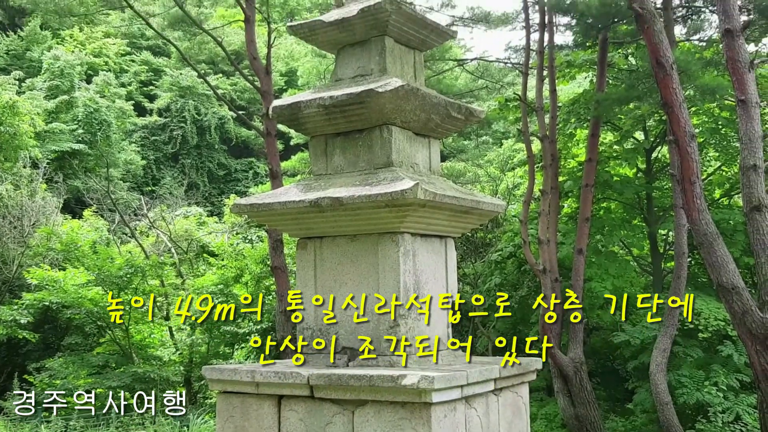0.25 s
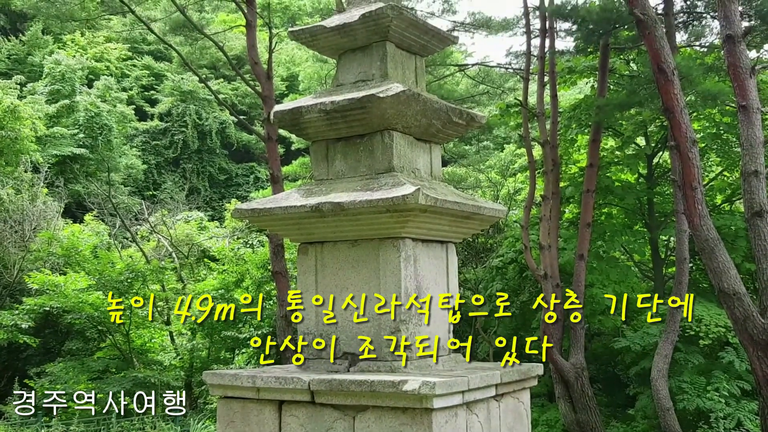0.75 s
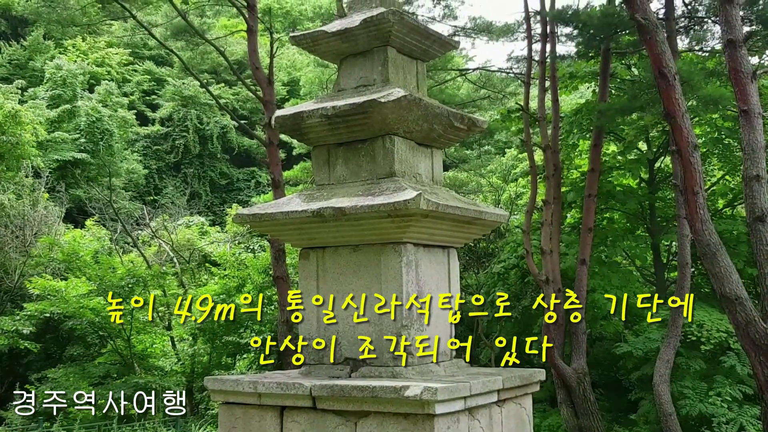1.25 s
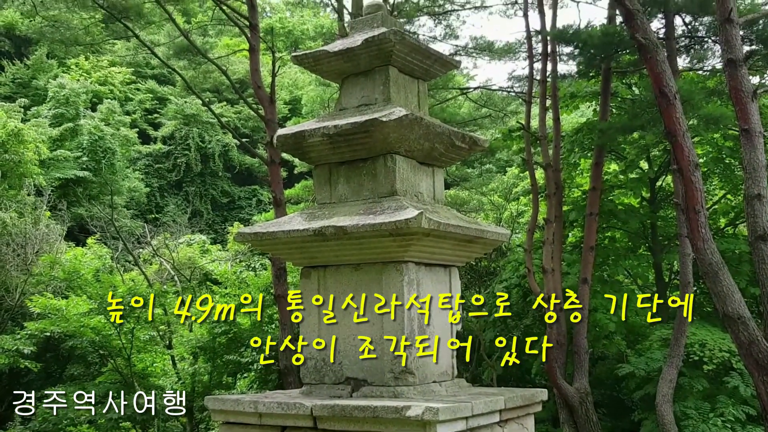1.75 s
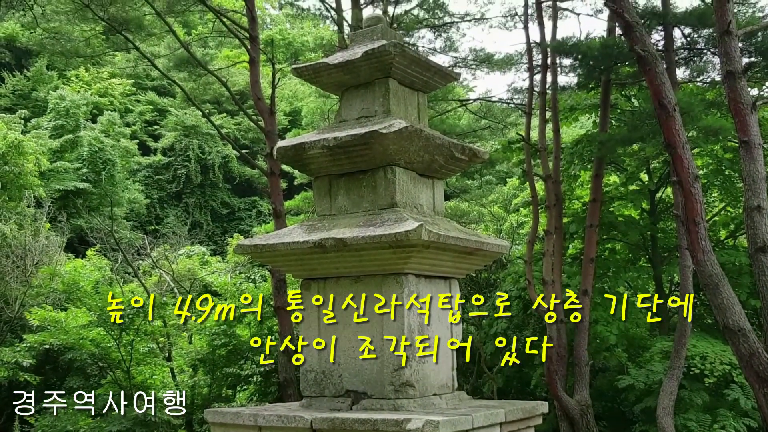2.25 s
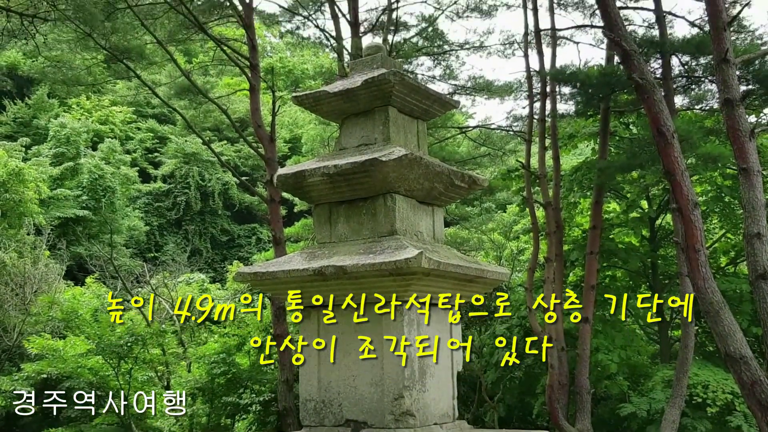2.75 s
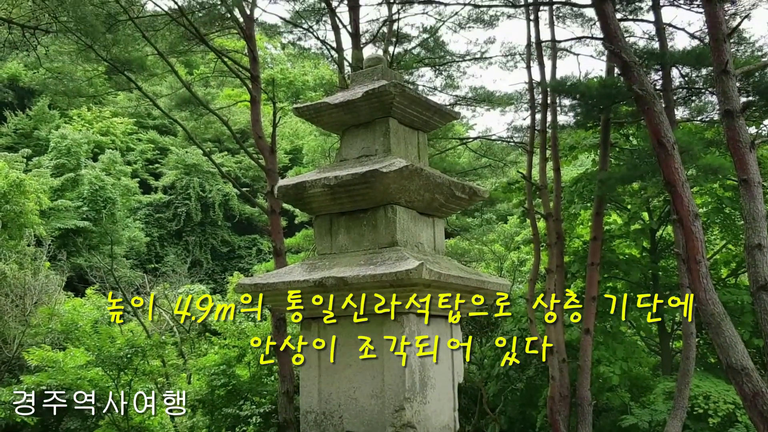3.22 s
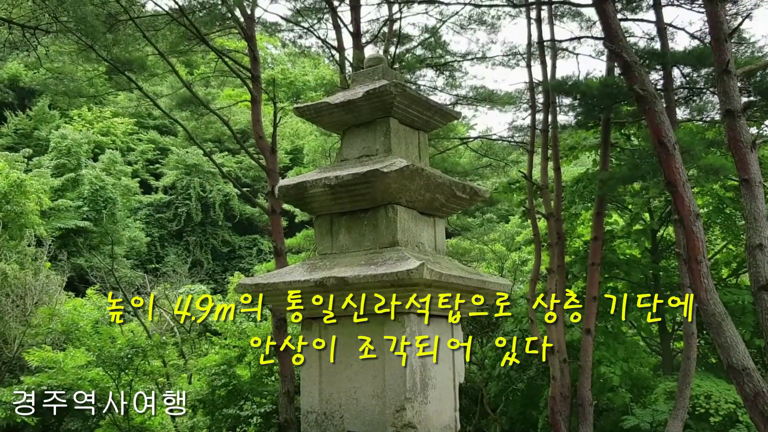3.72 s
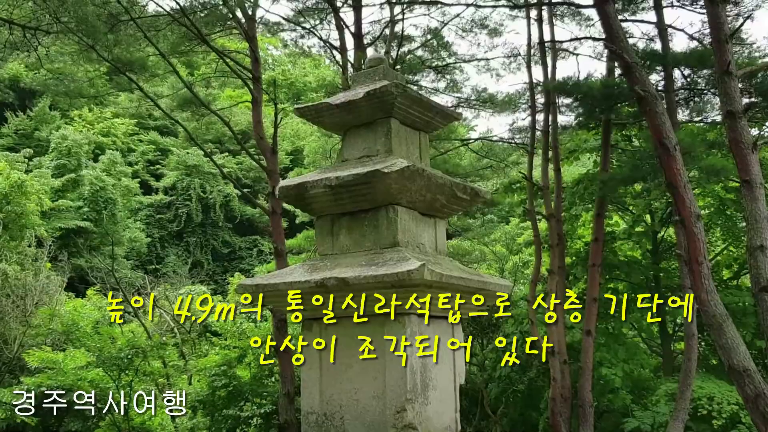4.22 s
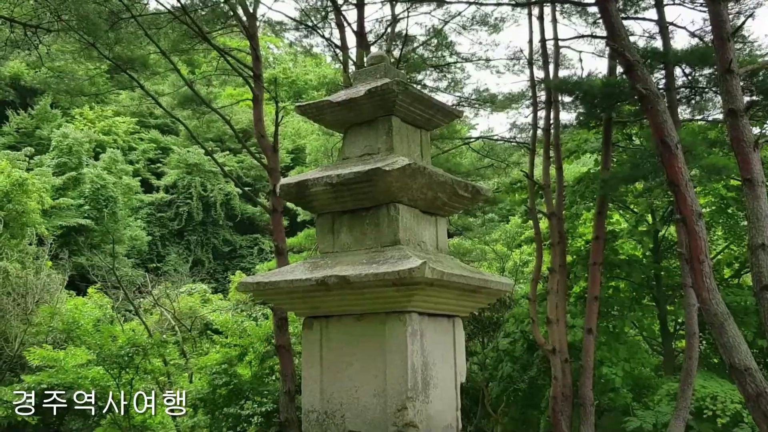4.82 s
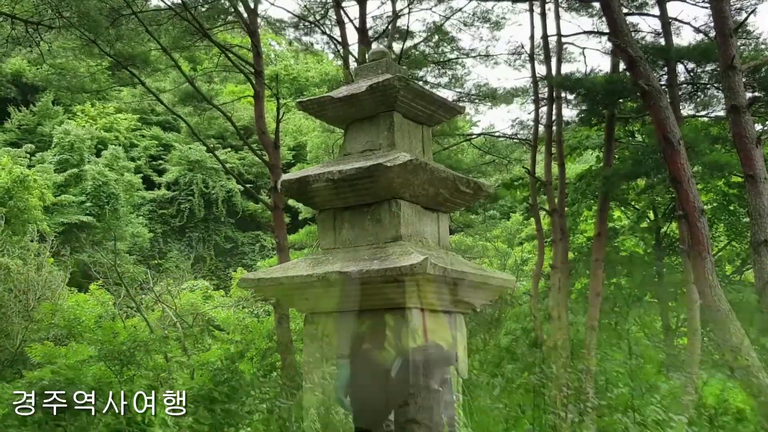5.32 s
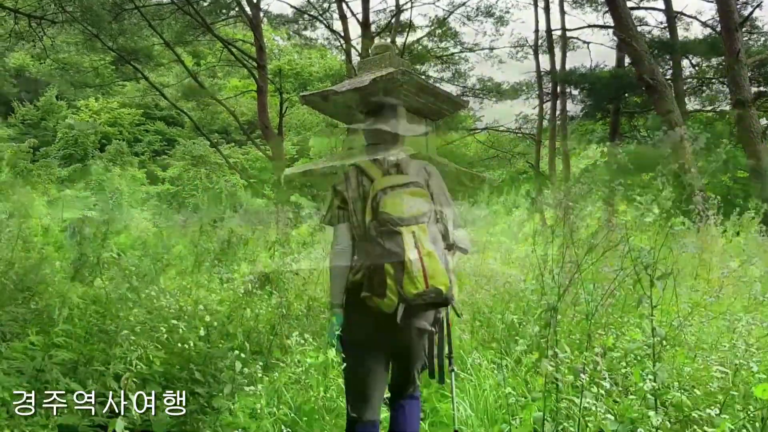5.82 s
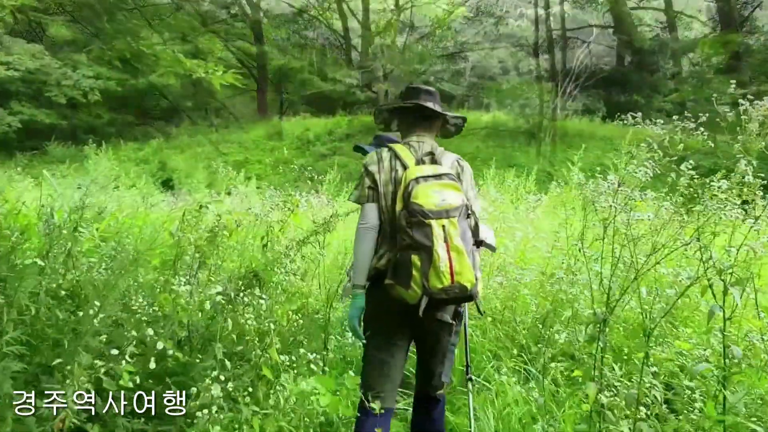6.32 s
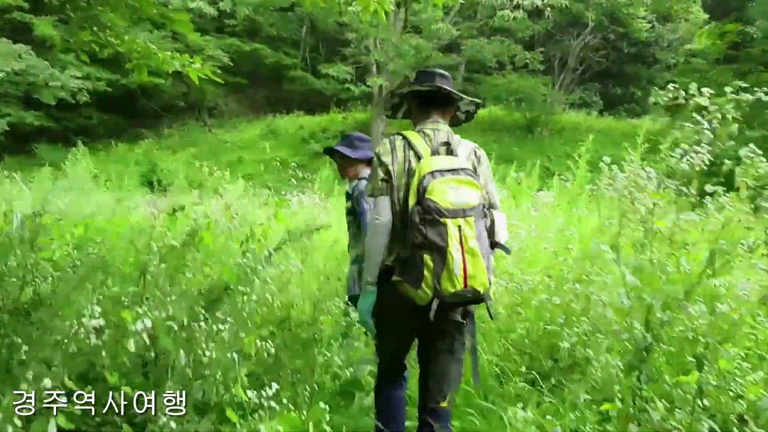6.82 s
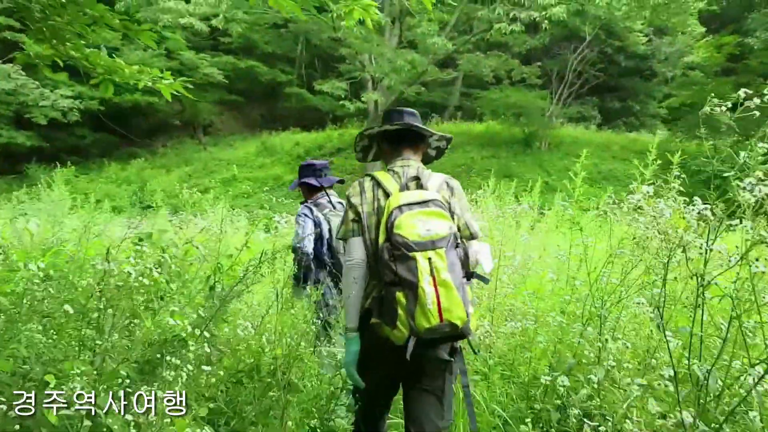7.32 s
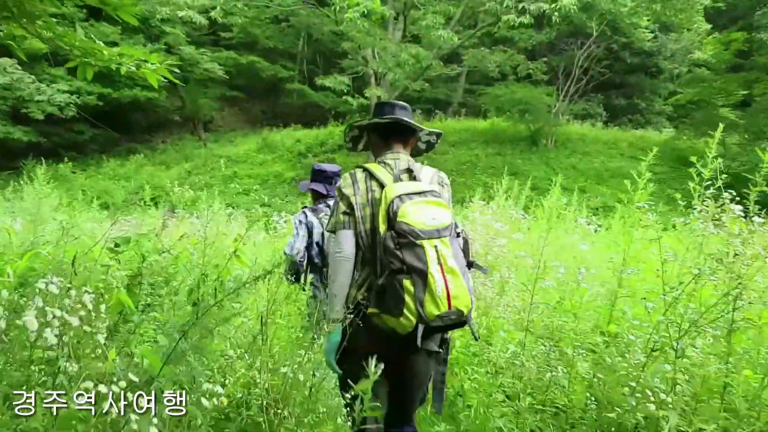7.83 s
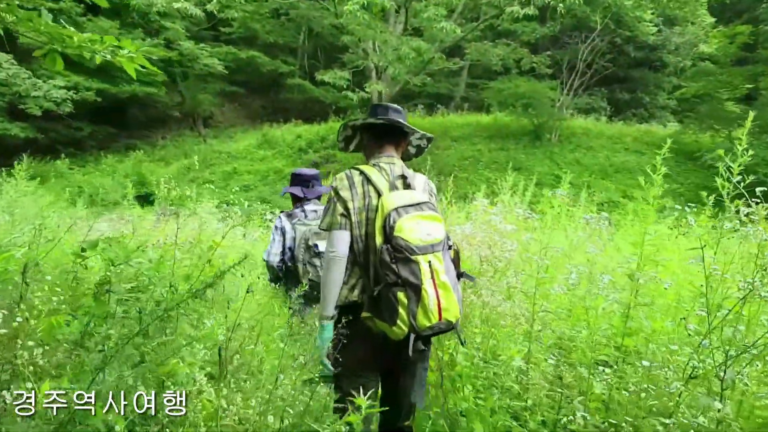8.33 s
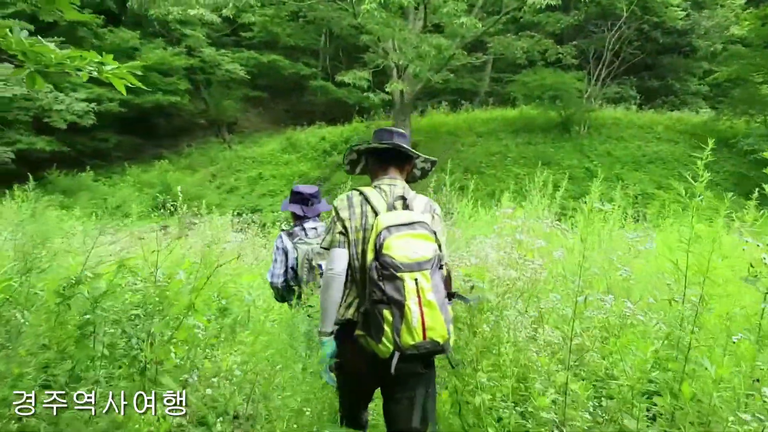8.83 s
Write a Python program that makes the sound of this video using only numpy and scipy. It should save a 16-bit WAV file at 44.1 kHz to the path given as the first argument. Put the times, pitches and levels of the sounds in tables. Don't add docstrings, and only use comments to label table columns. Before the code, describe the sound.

Outdoors in stereo on a hand-held camera microphone: a steady insect chorus around eight kilohertz opens with soft wind thumps and a tap. After a very brief silence, the chorus resumes with pulsing singers lower down and a shrill thirteen-kilohertz voice at left. Another singer builds at right, then stops late. Small rustles, ticks and rubs come from handling, with one clustered knock around four seconds.

```python
import sys
import numpy as np
from scipy import signal
from scipy.fft import rfft, irfft
from scipy.io import wavfile
from scipy.ndimage import uniform_filter1d

SR = 44100
rng = np.random.default_rng(int(sys.argv[2]) if len(sys.argv) > 2 else 0)


def bounce(signal):
    frames = np.transpose(np.atleast_2d(signal))
    limited = np.clip(frames, -1, 1)
    pcm = np.round(limited * 32767).astype(np.int16)
    wavfile.write(sys.argv[1], SR, pcm)


def gain_from_decibels(decibels):
    exponent = np.asarray(decibels, float) / 20
    return 10 ** exponent


N = 399546
TIME = np.arange(N) / SR
HZ = np.fft.rfftfreq(N, 1 / SR) + 1e-3
CHANGE_S = .83


def unit(x):
    return x / np.sqrt(np.mean(x ** 2, axis=-1, keepdims=True))


def by_place(before, after):
    return np.where(TIME < CHANGE_S, before, after)


def columns(table):
    s, *cols = np.transpose(table)
    return [np.interp(TIME, s, c) for c in cols]


def spread(db, pan_db):
    return 2 * gain_from_decibels(db) / np.sqrt(1 + gain_from_decibels(np.array([-2 * pan_db, 2 * pan_db])))


def swells(at_s, sizes, rise_s, fall_s, flat=2):
    t = TIME[::64]
    late = t - np.reshape(at_s, (-1, 1))
    bells = np.exp(-np.abs(late / np.where(late < 0, rise_s, fall_s)) ** flat)
    return np.interp(TIME, t, np.asarray(sizes) @ bells)


def walk(rate):
    k = int(SR / rate)
    steps = np.repeat(rng.standard_normal((2, N // k + 1)), k, axis=1)
    return unit(uniform_filter1d(uniform_filter1d(steps, k), k)[:, :N])


def noise(colour, like):
    mid, side = rng.standard_normal((2, N))
    like = np.clip(like, 0, 1)
    pair = np.sqrt(1 + like) * mid + np.sqrt(1 - like) * side * np.array([[1], [-1]])
    hz, db = np.transpose(colour)
    gain = gain_from_decibels(np.interp(np.log(HZ), np.log(hz), db, -120, -120))
    return unit(irfft(rfft(pair) * gain, N))


def clicks(rate_hz, drift, jitter_s, scatter_db, other):
    fine = 4
    beats = np.cumsum(2 * rate_hz * (1 + drift * walk(4)[0]) / SR) + rng.random()
    count = np.arange(1, int(beats[-1]))
    chance = rng.standard_normal((9000, 2))[:len(count)].T
    at = np.interp(count, beats, TIME) + jitter_s * chance[0]
    size = np.where(count % 2, 1, other) * gain_from_decibels(scatter_db * chance[1])
    return np.bincount(np.abs(at * SR * fine).astype(int), size, N * fine)[:N * fine]


def song(rates_hz, sac, drift, jitter_s, other, wet_db, scatter_db=3.5, t60=0.46, alone=False):
    ring = 0
    for hz, width, db in sac:
        detuning = (HZ / hz - hz / HZ) * hz / width
        ring = ring + gain_from_decibels(db / 3) / (1 + 1j * detuning)
    ring = ring ** 3
    singers = []
    for _ in range(2 - alone):
        singers.append(sum(clicks(r, drift, jitter_s, scatter_db, other) for r in rates_hz))
    trees = rng.standard_normal((2, SR)) * gain_from_decibels(-60 * TIME[:SR] / t60)
    paths = 1 + gain_from_decibels(wet_db) * rfft(unit(trees) / np.sqrt(SR), N)
    return unit(irfft(rfft(singers)[:, :len(HZ)] * ring * paths, N))


# peak in seconds, left in dB, right in dB.
SWAY = [(0.03, 0.0, -3.1), (0.13, -0.0, -1.9), (0.19, 0.6, 1.2), (0.6, 0.2, 3.0), (0.69, 0.1, 2.2),
        (0.93, 1.6, 1.9), (1.07, -1.2, -1.9), (1.15, -0.1, 2.7), (1.28, -0.7, -3.0), (1.41, -0.7, 3.0),
        (1.64, 0.1, -2.8), (1.8, -1.0, -0.9), (1.9, -0.8, -1.0), (1.98, 1.3, 0.5), (2.14, -1.1, -0.4),
        (2.43, 0.8, 1.6), (2.53, -0.9, -2.7), (2.81, -0.2, 1.5), (2.93, 0.5, -1.7), (3.07, -0.2, 2.9),
        (3.28, 1.1, 2.5), (3.36, 0.2, -1.8), (3.43, 1.8, 1.4), (3.69, -1.1, -0.7), (3.79, 0.6, 1.8),
        (3.9, 0.5, -2.4), (3.97, -0.9, -0.8), (4.17, -2.1, -0.3), (4.28, -0.9, -1.0), (4.39, 0.4, 2.7),
        (4.49, 1.2, 0.3), (4.57, -0.1, 2.1), (4.66, -0.1, -1.7), (4.74, 1.1, 0.2), (4.98, 0.4, -2.4),
        (5.08, -0.3, -1.9), (5.22, 0.1, -2.9), (5.38, -0.7, 1.9), (5.43, -0.8, -1.1), (5.56, 0.5, 1.8),
        (5.67, 0.6, 1.3), (5.83, -1.2, 0.3), (5.97, 1.1, 0.9), (6.38, 1.1, 0.5), (6.47, -1.1, 0.3),
        (6.68, -0.6, 1.9), (6.88, 0.5, -1.5), (7.0, 0.9, 2.1), (7.08, 0.3, -2.7), (7.24, -1.3, 0.6),
        (7.31, 0.1, -3.5), (7.54, 0.1, 2.5), (7.61, 0.7, 1.2), (7.76, 0.1, -2.6), (7.98, -0.8, 1.0),
        (8.28, 1.7, 1.0), (8.37, 0.8, 1.4), (8.66, 0.0, -2.8), (8.79, -1.7, -0.6), (8.97, 1.0, 1.1)]


def shade():
    s, *ports_db = np.transpose(SWAY)
    sway_db = np.array([swells(s, port, .04, .04) for port in ports_db])
    return gain_from_decibels(0.65 * sway_db + 0.52 * walk(14)[0] + [[0.2], [0.8]])


BEATS = dict(near=[199, 176, 231], far=[124, 151, 188, 213, 237], throb=[183.9, 187.3],
         side=[119.6, 164.85], throb_low=[176, 169], deep=[131, 157], crowd=[143, 171, 209, 226])
# level in dB, left minus right in dB.
CHORUS = [
    (-36, 11.4),
    (-40, 5.2),
]
# resonance in Hz, width in Hz, level in dB.
CHORUS_SAC_FIRST = [(8140, 1900, 24), (9080, 760, 3.5), (6960, 840, -9), (10000, 1700, -51)]
CHORUS_SAC = [(7684, 1810, 10.5), (8600, 1720, -1.5), (9640, 1650, -35.5)]


def far_chorus():
    near = song(BEATS["near"], CHORUS_SAC_FIRST, drift=.002, jitter_s=2e-5, other=0.66, wet_db=9.5)
    far = song(BEATS["far"], CHORUS_SAC, drift=.006, jitter_s=5e-5, other=-0.69, wet_db=10.0, t60=1.24)
    level_db, pan_db = [by_place(*column) for column in np.transpose(CHORUS)]
    return by_place(near, far) * spread(level_db, pan_db) * gain_from_decibels(1.5)


# resonance in Hz, width in Hz, level in dB.
LOW_SAC = [(4210, 1850, 5), (3292, 1240, -5.5), (2507, 1030, -17)]
# time in seconds, level in dB, left minus right in dB.
LOW = [(0, -52, -0.5), (.79, -52, -2), (.87, -54.5, 0), (2.3, -52, 0.5), (3.2, -52, 1.5), (4.4, -51.5, 2.5),
       (5.8, -49, 0), (7.2, -53, 2), (9.06, -50, -1.5)]


def low_crowd():
    low = song(BEATS["crowd"], LOW_SAC, drift=.005, jitter_s=1e-4, other=0.39, wet_db=11.5)
    return low * spread(*columns(LOW))


# resonance in Hz, width in Hz, level in dB.
HAZE_SAC = [(13250, 3700, 17), (15000, 7000, -16), (11300, 2300, -6.5)]
# time in seconds, level in dB, left minus right in dB.
HAZE = [(0, -56, 2), (.79, -55, 10), (.87, -55.5, 2), (1.9, -54.5, 6), (3.0, -51, 5), (4.8, -48, 5.5),
        (6.1, -49, 6), (7.3, -50, 7), (9.06, -50, 3)]


def far_haze():
    haze = song(BEATS["crowd"], HAZE_SAC, drift=0.004, jitter_s=1e-4, other=0.43, wet_db=0.5)
    return haze * spread(*columns(HAZE)) * gain_from_decibels(-0.5)


def crowds():
    return shade() * (far_chorus() + low_crowd() + far_haze())


# resonance in Hz, width in Hz, level in dB.
SIDE_SAC = [(6140, 300, -8), (6345, 190, -11), (6710, 710, 3)]
# time in seconds, level in dB, left minus right in dB.
SIDE_SONG = [(0, -51, -19), (.79, -45, 6), (.87, -47, -14), (2.1, -58, -22), (3.6, -51, -31),
             (5.0, -45.5, -20), (6.07, -42, -9), (7.62, -43.5, -4), (7.69, -60, -21), (9.06, -52, -15)]


def side_singer():
    side_db, pan_db = columns(SIDE_SONG)
    side = song(BEATS["side"], SIDE_SAC, drift=.0015, jitter_s=2.8e-5, other=-.1, wet_db=3)
    return side * spread(side_db - 4.5, pan_db) * shade()


# resonance in Hz, width in Hz, level in dB.
DEEP_SAC = [(5430, 2250, 0)]
# time in seconds, level in dB.
DEEP_SONG = [(0, -61), (.79, -57), (.87, -47), (1.87, -49), (2.5, -56), (5.3, -53), (7.6, -55), (9.06, -56)]


def deep_voice():
    (deep_db,), (_, pan_db) = columns(DEEP_SONG), columns(SIDE_SONG)
    deep = song(BEATS["deep"], DEEP_SAC, drift=.003, jitter_s=4e-5, other=-1.2, wet_db=9.5)
    return deep * spread(deep_db - 1.0, pan_db / 2)


# peak in seconds, level in dB.
THROB = [(.3, -88), (.54, -57), (.92, -83), (1.2, -50), (1.76, -57), (2.33, -55), (2.77, -48), (3.2, -51),
         (3.47, -51.5), (3.91, -50), (4.31, -56), (4.74, -47), (5.14, -44.5), (5.58, -49), (5.97, -45),
         (6.4, -49), (6.78, -49), (7.21, -44.5), (7.63, -45.5), (8.06, -45), (8.44, -58), (8.58, -48),
         (8.9, -56), (9.05, -52)]
# resonance in Hz, width in Hz, level in dB.
THROB_SAC = [(4300, 400, 0), (3900, 450, -4), (4650, 450, -13), (3500, 450, -13)]
THROB_LOW_SAC = [(3876, 1580, 4), (4650, 700, -20.5)]


def throbbing_singers():
    rise_s, fall_s, rest, low_lag_s = 0.14, 0.11, gain_from_decibels(-56), 0.088
    s, db = np.transpose(THROB)
    throb = song(BEATS["throb"], THROB_SAC, drift=.003, jitter_s=1.3e-5, other=-.6, wet_db=3)
    low = song(BEATS["throb_low"], THROB_LOW_SAC, drift=.004, jitter_s=2e-5, other=-0.83, wet_db=4.5)
    low = low * gain_from_decibels(-1.0 + 1.9 * walk(3))
    throb = throb * (swells(s, gain_from_decibels(db), rise_s, fall_s) + rest)
    low = low * (swells(s + low_lag_s, gain_from_decibels(db), rise_s, fall_s) + rest)
    return (throb + low) * gain_from_decibels([[-3], [-2.7]])


# peak in seconds, level in dB.
SHRILL = [(.45, -64), (1.35, -58), (1.7, -57.5), (1.99, -61), (2.67, -54), (3.06, -54), (3.44, -47.5),
          (4.0, -49), (4.35, -50.5), (4.86, -47), (5.38, -49), (5.8, -50), (6.15, -48.5), (6.57, -48),
          (7.01, -49), (7.42, -49), (7.81, -51), (8.33, -64), (9.0, -57)]
# resonance in Hz, width in Hz, level in dB.
SHRILL_SAC = [(13350, 2100, 15), (12630, 400, -18), (11500, 540, -9)]
# time in seconds, muscle beats a second.
SHRILL_RATE = [(0, 196), (.8, 196), (.9, 165), (4.0, 166), (5.08, 167), (5.16, 192), (5.8, 194.4),
               (9.1, 194.4)]


def shrill_singer():
    split_hz, sag_db_per_beat = 14400, 0.17
    s, db = np.transpose(SHRILL)
    (rate_hz,) = columns(SHRILL_RATE)
    shrill = song([rate_hz], SHRILL_SAC, drift=.0007, jitter_s=6e-6, other=-.25, wet_db=1,
                  scatter_db=1.5, t60=.12)
    treble = irfft(rfft(shrill) / (1 + (split_hz / HZ) ** 40), N)
    sag_db = by_place(0, sag_db_per_beat * (rate_hz - 180))
    shrill = (shrill - treble) * gain_from_decibels(sag_db) + treble * gain_from_decibels(-sag_db)
    throbs = swells(s, gain_from_decibels(db), rise_s=0.13, fall_s=0.13, flat=4.6) + gain_from_decibels(-69)
    return shrill * throbs * gain_from_decibels([[4], [-9]])


CLEAR_BEATS = [(176.4, -.9), (186.8, -.9), (187.6, .9), (183.5, -.9)]
# resonance in Hz, width in Hz, level in dB.
CLEAR_SACS = [
    [(4410, 300, 0), (3710, 260, -1), (4760, 260, -5)],
    [(4300, 300, 0), (3920, 300, -4), (3550, 300, -7), (4670, 300, -14)],
    [(4130, 300, 0), (4500, 300, -3)],
    [(3850, 300, 0), (4590, 300, -2)],
]
# peak in seconds, level in dB.
CHIRPS = [
    [(1.78, -50), (2.31, -46.5), (2.78, -47.5), (3.25, -48), (3.7, -47), (4.12, -46.5), (4.5, -54),
     (4.77, -54), (5.69, -47), (8.42, -51), (8.87, -47)],
    [(.55, -54), (2.18, -49), (2.6, -48.5), (3.05, -49), (3.47, -46.5), (3.9, -49), (4.29, -41),
     (4.72, -46), (5.13, -48), (5.57, -44.5), (5.97, -48), (6.38, -54), (6.78, -44), (7.21, -44),
     (7.62, -50)],
    [(.42, -65), (.49, -51), (8.55, -45), (8.67, -47), (9.04, -49)],
    [(5.0, -51), (5.1, -49), (5.93, -50), (7.97, -58), (8.07, -53), (8.14, -44.5)],
]


def clear_singers():
    out = 0
    for (beats, other), sac, chirps in zip(CLEAR_BEATS, CLEAR_SACS, CHIRPS):
        s, db = np.transpose(chirps)
        clear = song([beats], sac, drift=.0015, jitter_s=1e-5, other=other, wet_db=-5,
                     scatter_db=2, alone=True)
        out = out + clear * swells(s, gain_from_decibels(db - 2.0), rise_s=0.045, fall_s=0.058) * shade()
    return out


def soloists():
    throbbing = shade() * (throbbing_singers() + shrill_singer())
    return side_singer() + deep_voice() + clear_singers() + throbbing


# frequency in Hz, level in dB.
WIND = [(20, -56), (45, -11), (74, -2), (95, -15.5), (140, -21), (220, -29.5), (400, -36.5)]
# peak in seconds, level in dB, left minus right in dB.
GUSTS_FIRST = [(.06, -43, 21)]
GUSTS = [(0.26, -57, 19), (0.53, -36.5, 19), (1.11, -61, 3), (1.26, -73, -3), (1.65, -51.5, -17),
         (1.8, -81, 5), (2.34, -70, -14), (2.53, -61, 7), (2.83, -66, 1), (3.34, -57, -1),
         (3.755, -47.5, -5), (4.38, -49, -4), (4.59, -51, -4), (4.96, -51, -3), (5.3, -55, -3),
         (5.51, -57, 2), (5.87, -88, -17), (6.2, -87, 0), (6.51, -69, -12), (6.97, -59, 1), (7.19, -59, -2),
         (7.68, -58, -4), (7.98, -76, 5), (8.18, -76, 1), (8.4, -89, 1), (8.84, -59, -6)]


def wind():
    gust_s = 0.069
    s, db, pan_db = np.transpose(GUSTS_FIRST + list(GUSTS))
    puffs = np.array([swells(s, gain, gust_s, gust_s) for gain in spread(db - 6.0, pan_db)])
    calm = gain_from_decibels([by_place(-44, -61.5), by_place(-46, -61)])
    return noise(WIND, like=.4) * (puffs + calm * gain_from_decibels(2.5 * walk(2.6)))


# peak in seconds, level in dB.
SWISH = [(.3, -59.5), (.5, -79), (.75, -64), (.92, -69.5), (1.14, -70), (1.59, -68.5), (1.69, -75),
         (1.95, -68.5), (2.35, -73), (2.52, -72), (2.73, -65), (3.14, -66.5), (3.43, -60.5), (3.6, -65.5),
         (3.73, -69), (3.86, -61), (3.93, -60), (4.16, -63.5), (4.59, -63), (5.28, -69), (5.6, -68),
         (5.98, -95), (6.12, -70), (6.69, -85), (7.13, -82), (7.56, -68), (7.84, -102), (8.18, -71),
         (8.32, -79), (8.62, -68), (8.96, -67)]
# frequency in Hz, level in dB.
RUSTLE = [(100, -3), (300, -3.5), (600, -1), (1000, -8), (2000, -7), (4000, -11.5)]
AIR = [(120, -1), (220, -16), (500, -15.5), (800, -15), (1250, -7.5), (1900, -11), (2600, -13), (3400, -28)]


def brushing():
    s, db = np.transpose(SWISH)
    brush = swells(s, gain_from_decibels(db), rise_s=0.053, fall_s=0.11)
    cloth = (brush + gain_from_decibels(by_place(-55.5, -71.5))) * gain_from_decibels(-2.0 + 2.4 * walk(25)[0])
    leaf_flutter = gain_from_decibels(6.0 + 2.07 * walk(33) + 2.0 * walk(5)[0])
    leaves = (brush * gain_from_decibels(-6.5) + gain_from_decibels(by_place(-70.5, -79))) * leaf_flutter
    return noise(RUSTLE, like=0.51) * cloth + noise(AIR, like=0.42) * leaves


# start in seconds, peak in dB.
SLAPS = [
    (0.046, -24),
    (0.247, -17.5),
    (0.526, -17.5),
]


def slaps():
    slap_hz, t60_s, rise_s = 64, 0.091, .004
    swing = 0
    for s, db in SLAPS:
        t = np.maximum(TIME - s, 0)
        fade = gain_from_decibels(-60 * t / t60_s) * (1 - np.exp(-t / rise_s))
        swing = swing + gain_from_decibels(db) * np.sin(2 * np.pi * slap_hz * t) * fade
    return swing * gain_from_decibels([[0], [-15]])


# start in seconds, peak in dB, ring in Hz.
TAPS = [(0.269, -43, 552), (0.291, -21.5, 560), (0.294, -29, 1980), (0.298, -27, 3600), (0.313, -29.5, 220),
        (0.316, -30, 2500), (0.323, -28.5, 568), (0.331, -40, 600), (0.345, -38, 626), (0.362, -44, 604),
        (0.394, -40, 560), (0.414, -48, 600), (0.771, -38.5, 220), (1.584, -44, 1000), (1.591, -38.5, 1190),
        (1.598, -40, 240), (1.932, -42, 2020), (2.351, -45, 1240), (2.678, -53, 660), (3.13, -42, 776),
        (3.24, -53, 660), (3.331, -48.5, 563), (3.429, -44.5, 643), (3.593, -48, 590), (3.664, -44, 1300),
        (3.672, -42, 1300), (3.723, -38.5, 1410), (3.724, -40, 2300), (3.759, -42, 1250),
        (3.789, -42, 1240), (3.796, -42, 1240), (4.111, -51, 1140), (4.586, -40.5, 543),
        (4.7928, -22.5, 3750), (5.273, -47.5, 610), (6.1, -46, 1180), (7.127, -46.5, 563),
        (7.536, -46.5, 348), (7.597, -41, 345), (8.176, -48.5, 570), (8.317, -35.5, 2120),
        (8.612, -41.5, 380), (8.613, -35, 1150), (8.641, -42, 1370), (8.958, -57, 480)]
# start in seconds, peak in dB, ring in Hz, T60 in seconds.
KNOCKS = [(3.804, -32.5, 1200, 0.02), (3.815, -28, 1230, 0.015), (3.83, -32, 1550, 0.009),
          (3.834, -24.5, 560, 0.012), (3.836, -22, 168, 0.025), (3.865, -23, 1310, 0.0077),
          (3.869, -26.5, 1590, 0.014), (3.8925, -36, 1300, 0.01), (3.893, -37, 1900, 0.0073),
          (3.904, -26, 1225, 0.034), (3.9126, -17.5, 1270, 0.008), (3.9126, -15.5, 657, 0.012),
          (3.9163, -16.5, 844, 0.018), (3.9175, -27, 2220, 0.011), (3.921, -27, 650, 0.016),
          (3.948, -37.5, 700, 0.012), (3.948, -35, 2200, 0.0073), (4.008, -41, 317, 0.02)]
# frequency in Hz, level in dB.
BODY = [(323, -7), (657, -3), (851, -19), (1249, -31), (1803, -6.5), (2256, -29)]


def knocks():
    tap_cycles, tap_longest_s, body_top_hz, port_lag = 17.6, 0.034, 1900, 3
    out, t = np.zeros((2, N + 4096)), TIME[:4096]
    hits = [(s, db, hz, min(tap_cycles / hz, tap_longest_s)) for s, db, hz in TAPS] + list(KNOCKS)
    modes = sum(gain_from_decibels(g) * np.sin(2 * np.pi * f * t) for f, g in BODY)
    for (s, db, hz, t60), scrape in zip(hits, rng.standard_normal((len(hits), 3, 4096))):
        fade = gain_from_decibels(-60 * t / max(t60, .006)) * (1 - np.exp(-t * hz / 0.75))
        deep = 1 / (1 + (hz / body_top_hz) ** 8)
        ring = (np.sin(2 * np.pi * hz * t) + gain_from_decibels(-6.0) * deep * modes) * fade
        rough = uniform_filter1d(scrape[0] + 0.75 * scrape[1:], size=15)
        tail = deep * gain_from_decibels(-8.0) * rough * gain_from_decibels(-60 * t / 0.035)
        out[:, int(s * SR):][:, :4096] += gain_from_decibels(db) * (ring + tail)
    return np.array([out[0, :N], np.roll(out[1], port_lag)[:N]]) * gain_from_decibels([[1.2], [-1.2]])


# start in seconds, length in seconds, ring in Hz, level in dB.
RUBS = [
    (1.537, 0.11, 200, -56.5),
    (2.63, 0.13, 660, -64),
    (3.312, 0.24, 406, -62),
    (8.16, 0.091, 150, -61),
    (8.525, 0.05, 376, -68.5),
    (8.8, 0.25, 393, -71),
]


def rubs():
    out = np.zeros(N)
    for s, length, hz, db in RUBS:
        swell = np.sin(np.pi * np.clip((TIME - s) / length, 0, 1)) ** 0.23
        ring = 1 / (1 + 1j * (HZ / hz - hz / HZ) * 4.5) ** 2
        out += gain_from_decibels(db) * swell * unit(irfft(rfft(rng.standard_normal(N)) * ring, N))
    return out


def scene():
    return crowds() + soloists() + wind() + brushing() + slaps() + knocks() + rubs()


# frequency in Hz, level in dB at which a bin is dropped.
DROPPED = [(100, -23), (300, -15.5), (700, -4), (1500, -3.5), (3000, -6), (4200, -5.5), (5400, 0.5),
           (6500, -17.5), (9000, -5.5), (11000, -3.5), (13000, -3), (15000, -11), (15700, -4)]


def spectral_gate(x, patch_db):
    hz, _, z = signal.stft(x, SR, nperseg=1536)
    size = np.abs(z)
    local = uniform_filter1d(uniform_filter1d(size, size=25, axis=1), size=5, axis=2)
    patches = np.repeat(rng.standard_normal((2, 49, z.shape[2])), 16, axis=1)[:, :len(hz)]
    limit_db = np.interp(hz, *np.transpose(DROPPED))[:, None]
    limit_db = limit_db + patch_db * uniform_filter1d(patches, size=2, axis=2)
    blows = size[:, 14:70].sum(axis=1, keepdims=True)
    sudden = blows > 5 * np.median(blows)
    kept = z * ((size > local * gain_from_decibels(limit_db)) | sudden)
    return signal.istft(kept, SR, nperseg=1536)[1][:, :N]


def low_pass(x):
    return signal.sosfilt(signal.butter(12, 15840, fs=SR, output="sos"), x)


# time in seconds, level in dB.
CUT = [
    (.7965, 0),
    (.7972, -110),
    (.8578, -110),
    (.8582, 0),
]


def record(dry):
    tremble_db = np.array([[.5], [.9]]) * walk(20) + .35 * walk(9)[0]
    gated = spectral_gate(dry * gain_from_decibels(tremble_db), patch_db=7.0)
    (cut_db,) = columns(CUT)
    return low_pass(gated * gain_from_decibels(cut_db))


dry = scene()
out = record(dry)
bounce(out)
```